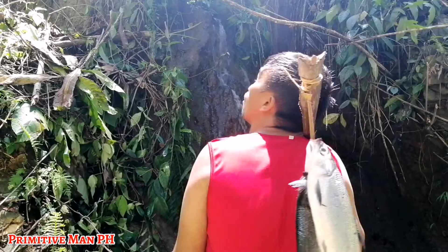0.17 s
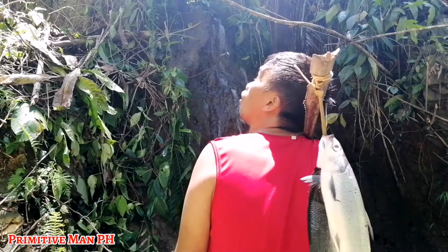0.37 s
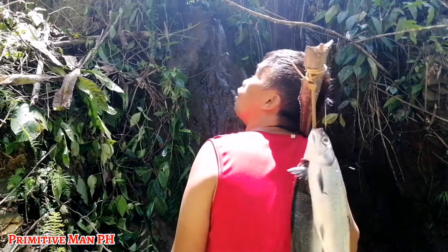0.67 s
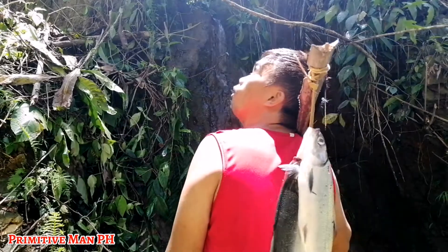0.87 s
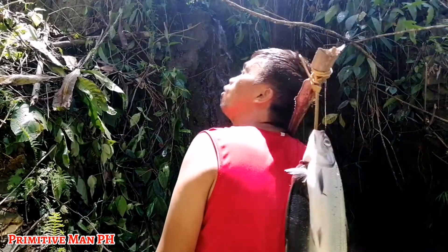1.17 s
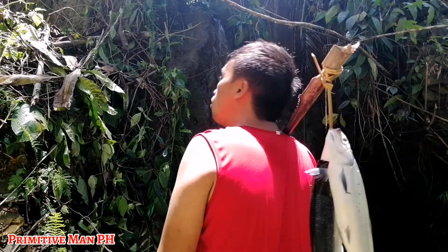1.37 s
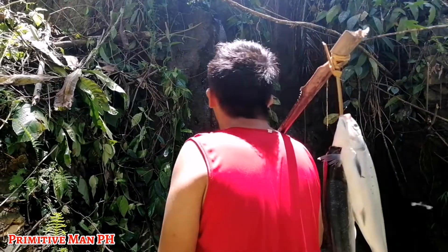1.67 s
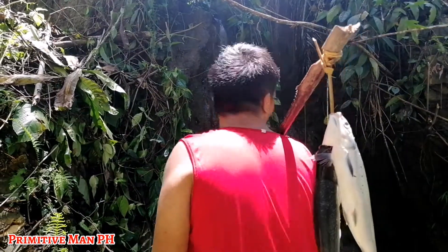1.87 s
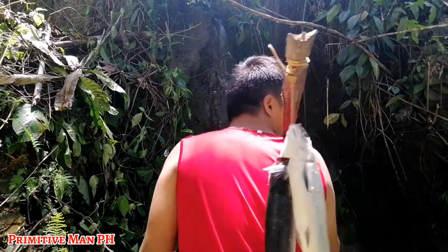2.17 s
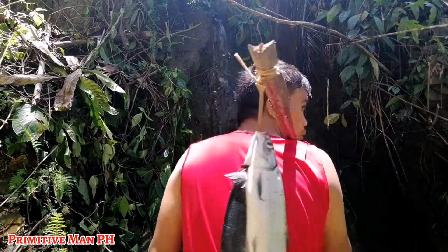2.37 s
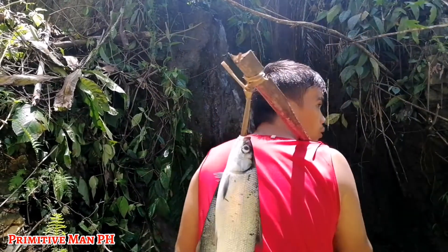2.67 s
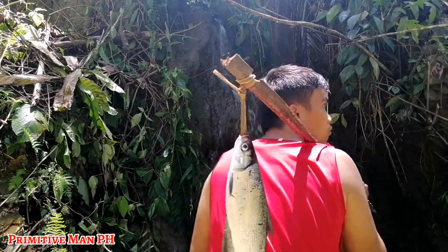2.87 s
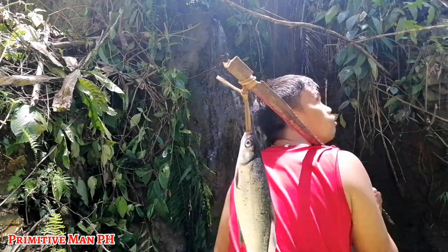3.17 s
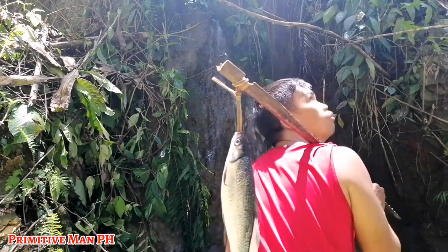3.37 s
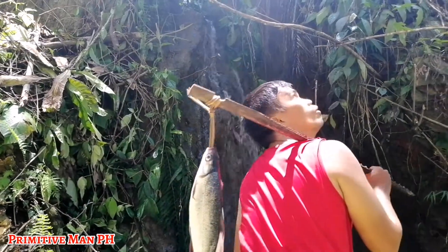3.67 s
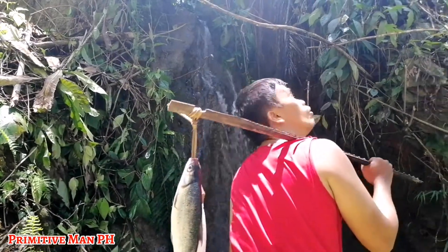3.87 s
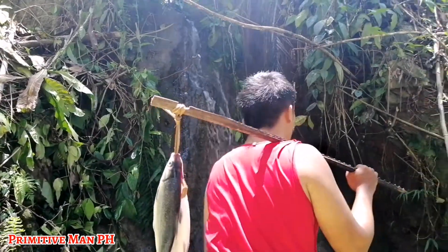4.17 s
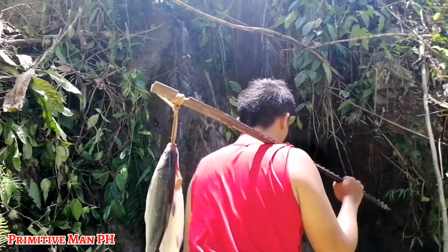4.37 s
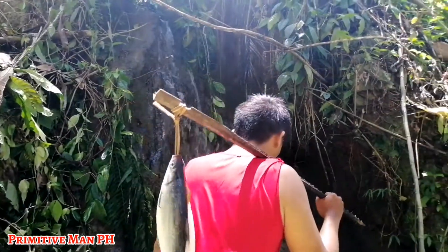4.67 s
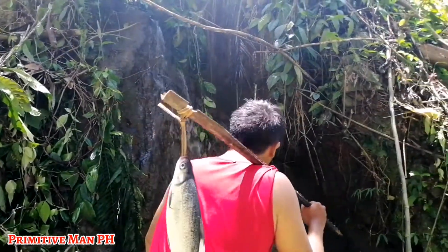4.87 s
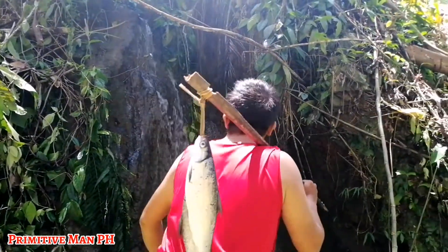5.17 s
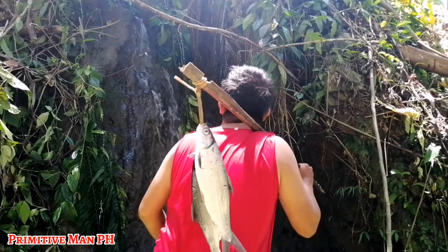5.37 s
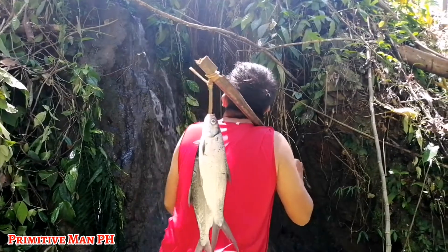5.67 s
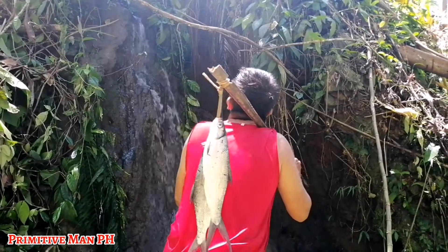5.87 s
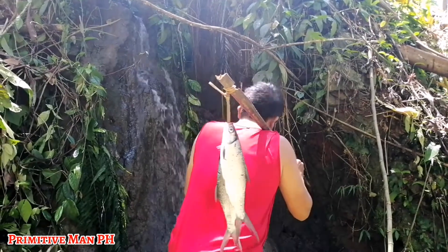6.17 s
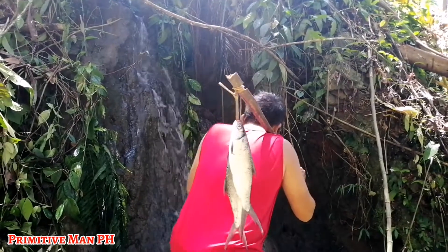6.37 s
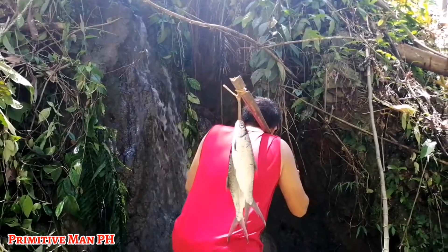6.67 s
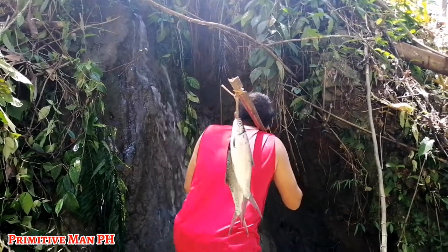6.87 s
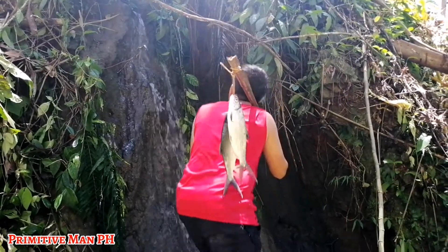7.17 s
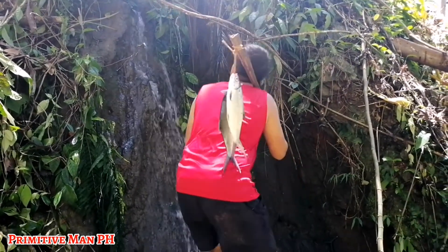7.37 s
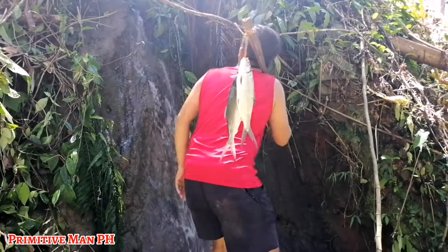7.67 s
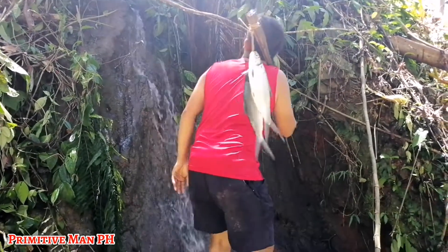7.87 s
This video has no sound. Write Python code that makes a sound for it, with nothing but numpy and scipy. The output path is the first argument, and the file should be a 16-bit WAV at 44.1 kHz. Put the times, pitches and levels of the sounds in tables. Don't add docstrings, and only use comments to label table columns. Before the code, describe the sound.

The first 0.2 seconds are silent, then a small waterfall fades in within about 0.2 seconds and runs to the end at 8 seconds. It is a bright, dense, grainy hiss made of countless drops clicking on wet rock, wide in stereo and leaning right. Heavy drops crack sharply nearby at irregular moments, around 0.8, 1.5, 2.5 and 4.1 seconds, more often and harder after 5.6. Beneath, the pool gives muted hollow plunges, low gulps and short rising bubble rings, mostly faint under the spray. The flow swells slightly near 2.3 to 2.5 seconds, where a dull bump on the microphone housing thuds at left. Around 6 seconds the stereo image shifts subtly as the hand turns. From 6 to 8 seconds, quick surges make the splashing stronger and more restless. A very faint bump comes near 7.6; the level drops at the last instant.

```python
import sys
import numpy as np
from scipy import signal
from scipy.fft import rfft, irfft, next_fast_len
from scipy.io import wavfile

SR = 44100
rng = np.random.default_rng(int(sys.argv[2]) if len(sys.argv) > 2 else 0)


def dump_mix(stems):
    frames = np.atleast_2d(stems).T
    limited = np.clip(frames, -1, 1)
    pcm = np.round(limited * 32767).astype(np.int16)
    wavfile.write(sys.argv[1], SR, pcm)


def boost_factor(decibels):
    exponent = np.asarray(decibels, float) / 20
    return 10 ** exponent


N = 354034


def in_time(rows):
    s, *columns = np.transpose(rows)
    return [np.interp(np.arange(N) / SR, s, c) for c in columns]


def rms_one(x):
    return x / np.sqrt(np.mean(x ** 2) + 1e-20)


def drift(rate_hz):
    r = np.exp(-40 * np.pi * rate_hz / SR)
    noise = rng.standard_normal(N // 20 + 4002)
    slow = signal.lfilter([1], [1, -2 * r, r * r], noise)[4000:]
    return np.interp(np.arange(N) / 20, np.arange(len(slow)), rms_one(slow))


def peaks(x, modes):
    for hz, width_hz, db in modes:
        middle = -2 * np.cos(2 * np.pi * hz / SR)
        lift = boost_factor(db / 2)
        k = np.pi * width_hz / SR
        x = signal.lfilter([1 + k * lift, middle, 1 - k * lift], [1 + k / lift, middle, 1 - k / lift], x)
    return x


def add(out, s, sound, pan_db):
    at = round(s * SR)
    sound = sound[..., :N - at]
    out[:, at:at + sound.shape[-1]] += sound * boost_factor(np.array([[pan_db / 2], [-pan_db / 2]]))


# t/s, left lag behind right/ms, left over right/dB
FALL_BEARING = [
    (0, 0.17, -4),
    (1.8, .18, -5.5),
    (3.3, 0.14, -5),
    (5.7, 0.11, -4.5),
    (6.3, -.15, -4),
    (8.03, -0.13, -4.5),
]


def drops(per_s, uneven_db, width_ms):
    at = np.flatnonzero(rng.random(N) < per_s / SR)
    size_db = uneven_db * np.minimum(rng.standard_exponential(N), 6)
    clicks = boost_factor(size_db)[at] * rng.choice([-1, 1], N)[at]
    lag_ms = in_time(FALL_BEARING)[0][at] + width_ms * rng.standard_normal(N)[at]
    late = np.clip(at + np.round(lag_ms * SR / 1000).astype(int), 0, N - 1)
    return rms_one(np.array([np.bincount(late, clicks, N), np.bincount(at, clicks, N)]))


def wash():
    reflected = signal.butter(1, 500, "high", fs=SR, output="sos")
    stirring = signal.butter(2, 90, fs=SR, output="sos")
    hiss = signal.sosfilt(reflected, rng.standard_normal((2, N)))
    return hiss + boost_factor(10.0) * signal.sosfilt(stirring, rng.standard_normal((2, N)))


# f/Hz, density/(dB per Hz)
ROCK_COLOUR = [(20, -17.5), (60, -18), (130, -12.5), (190, -8.5), (270, -7), (500, -2.5), (1000, 3),
               (1350, 1), (2500, 1), (5500, -1), (9000, 1.5), (13000, -1), (16000, -5.5)]
# f/Hz, width/Hz, lift/dB
POOL_HOLLOWS = [
    (215, 50, 4.5),
    (329.5, 55, 8),
    (553, 140, 4),
    (980, 67, 1),
]


def fall(spray_db, churn_db):
    size = next_fast_len(N)
    hz = np.maximum(np.fft.rfftfreq(size, 1 / SR), 10)
    colour_hz, colour_db = np.transpose(ROCK_COLOUR)
    colour = boost_factor(np.interp(np.log(hz), np.log(colour_hz), colour_db))
    impacts = drops(20000., uneven_db=1.5, width_ms=0.15)
    water = colour * rfft(impacts + boost_factor(-6) * wash(), size)
    octave = np.clip(np.log2(hz / 80), 0, 7.5)
    gush = drift(22.0) + 0.94 * drift(86)
    near = drift(16)
    out = 0
    for centre in np.arange(0, 7.6, .5):
        band = irfft(water * np.clip(1 - 2 * abs(octave - centre), 0, 1), size)[:, :N]
        high = np.clip((centre - 3.9) / 3.38, 0, 1)
        near = rms_one(0.52 * near + 0.94 * drift(13.2))
        patches_db = (0.45 + 0.35 * high) * gush + (1.6 - 2.0 * high) * near
        level_db = high * spray_db + (1 - high) * churn_db
        out = out + band * boost_factor(level_db + np.minimum(patches_db, 3.0))
    return peaks(out, POOL_HOLLOWS)


# t/s, spray level/dB
FALL_NEARNESS = [
    (0.4, -22),
    (2.0, -22),
    (3.4, -21.5),
    (5.8, -21),
    (6.8, -20.5),
    (8.03, -21),
]
# t of crest/s, height/dB, build-up/s
LIP_SURGES = [(0.48, 0, .05), (2.29, 2, 0.13), (2.49, 1.5, 0.13), (6.06, 1.5, .12), (6.21, 0.5, .04),
              (6.63, 1.5, 0.37), (6.86, 2, .18), (6.96, 3, .04), (7.05, 2.5, .03), (7.28, 4, .06),
              (7.58, 2.5, 0.14), (7.72, 2, .06), (7.94, 3, 0.26)]


def flow():
    die_s, plunge_lag_s = 0.057, 0.043
    churn_base_db, masked, answers = -34.5, 0.3, 0.33
    t = np.arange(N) / SR
    surge_db = np.zeros(N)
    for s, db, build_s in LIP_SURGES:
        surge_db = np.maximum(surge_db, np.interp(t, [s - build_s, s, s + die_s], [0, db, 0]))
    landed_db = np.interp(t - plunge_lag_s, t, surge_db)
    spray_db = in_time(FALL_NEARNESS)[0] + surge_db
    return spray_db, churn_base_db - masked * surge_db + answers * landed_db


# t/s, peak level/dB
HEAVY_DROPS = [(0.8135, -9), (1.0001, -10), (1.1078, -11), (1.5114, -9), (1.8087, -9), (2.0647, -9),
               (2.2298, -10), (2.4702, -8), (3.0015, -11), (3.8007, -13), (4.113, -9), (4.2272, -9),
               (5.6331, -7), (5.7009, -9), (5.9947, -7), (6.2018, -8), (6.3429, -11), (6.4896, -7),
               (6.5834, -7), (6.9466, -8), (7.2713, -10), (7.5322, -8), (7.5916, -7), (7.877, -9),
               (7.9967, -6)]


def smacks():
    out = np.zeros((2, N))
    t = np.arange(round(0.037 * SR)) / SR
    decay = np.exp(-t / 0.0013) + 0.28 * np.exp(-t / 0.011)
    for s, db in HEAVY_DROPS:
        crack = np.diff(rng.standard_normal((2, len(t) + 1))) * decay
        crack = crack / abs(crack).max(axis=1, keepdims=True)
        add(out, s, boost_factor(db - 1.5) * crack, 0)
    return out


def ring(hz, cycles, rise):
    turns = np.arange(round(cycles * SR / hz)) * hz / SR
    shape = np.sin(np.pi * (turns / cycles) ** .75) ** 2
    return shape * np.sin(2 * np.pi * turns * (1 + rise * turns / cycles))


POOL_PAN_DB = -4
# t of peak/s, f/Hz, peak level/dB
AIR_GULPS = [(0.804, 430, -37), (3.152, 376, -35), (4.455, 433, -38), (4.669, 322, -33),
             (5.185, 355, -38.5), (5.238, 330, -31), (5.765, 430, -37), (5.863, 398, -35),
             (6.108, 419, -40), (6.546, 400, -37), (6.626, 324, -33), (7.107, 409, -36), (7.51, 333, -33),
             (7.629, 318, -32)]


def gulps(out):
    for s, hz, db in AIR_GULPS:
        add(out, s - 5.97 / hz, boost_factor(db - 1.0) * ring(hz * 0.976, 12.0, rise=0.034), POOL_PAN_DB)


# t/s, peak level/dB, f/Hz
DEEP_PLUNGES = [(0.744, -45, 183), (1.063, -32.5, 221), (1.383, -39, 234), (1.661, -35, 215),
                (2.108, -40, 215), (2.424, -37, 223), (2.646, -35, 220), (2.856, -35, 221),
                (3.156, -38, 207), (3.241, -39, 234), (3.533, -35, 202), (3.822, -35, 213),
                (4.318, -39, 215), (4.669, -35.5, 218), (4.756, -32, 215), (5.007, -36, 202),
                (5.194, -39, 218), (5.294, -37, 210), (5.861, -38, 242), (5.982, -36, 210),
                (6.392, -38, 215), (6.791, -39.5, 213), (6.985, -39, 228), (7.085, -40, 251),
                (7.153, -37, 224), (7.857, -34, 207)]


def plunges(out):
    for s, db, hz in DEEP_PLUNGES:
        add(out, s, boost_factor(db - 1.0) * ring(hz * 0.977, 6.8, rise=.02), -3)


# t of peak/s, f/Hz, peak level/dB
CLEAR_BUBBLES = [(0.801, 667, -33), (1.033, 800, -32), (1.499, 1180, -28.5), (2.088, 1604, -29),
                 (2.148, 876, -31), (2.342, 1076, -28), (2.823, 690, -34), (2.917, 2379, -30),
                 (2.998, 1870, -29), (3.013, 2500, -28), (3.389, 610, -33.5), (3.406, 1162, -27),
                 (3.254, 1195, -32), (3.528, 2121, -27), (3.808, 996, -32), (3.936, 1210, -30),
                 (3.992, 1539, -33), (4.052, 1561, -28), (4.47, 1600, -31), (4.5, 2422, -29),
                 (4.625, 636, -32), (5.026, 2280, -27), (5.432, 2067, -27), (6.518, 2000, -27),
                 (7.234, 517, -33.8), (7.277, 523, -32), (7.497, 2620, -24), (7.561, 1140, -29),
                 (7.705, 1399, -31), (7.725, 1690, -29)]


def bubbles(out):
    spots = np.clip(rng.standard_normal(len(CLEAR_BUBBLES)), -2, 2)
    for (s, hz, db), spot in zip(CLEAR_BUBBLES, spots):
        cycles = 4.78 + .016 * hz
        sound = boost_factor(db + 1.5) * ring(hz * .98, cycles, rise=0.017)
        add(out, s - .42 * cycles / hz, sound, POOL_PAN_DB + 2.5 * spot)


def bubble_crowd(out):
    for when, size, loud, side in rng.random((900, 4)):
        hz = 299.7 * 12.7 ** size
        sound = boost_factor(-48 + 3.2 * loud) * ring(hz, 14.0, rise=0.044)
        add(out, when * (N - 1) / SR, sound, -3 + 8 * (side - .5))


def pool(lag_ms):
    out = np.zeros((2, N))
    gulps(out)
    plunges(out)
    bubbles(out)
    bubble_crowd(out)
    behind = np.arange(N) - lag_ms * SR / 1000
    out[0] = np.interp(behind, np.arange(N), out[0])
    return out


# f/Hz, width/Hz, lift/dB
LEFT_RESONANCES = [
    (11150, 2300, 12.5),
    (1583, 130, 5.5),
]
RIGHT_RESONANCES = [
    (9775, 3270, 13),
    (3430, 1320, 6),
    (5600, 4800, -2),
    (7100, 590, 1),
]


def through_ports(water, pan_db):
    left = peaks(water[0], LEFT_RESONANCES) * boost_factor(pan_db / 2 + 1.58)
    right = peaks(water[1], RIGHT_RESONANCES) * boost_factor(-pan_db / 2 + 0.05)
    return np.array([left, right])


# t/s, peak level/dB, length/s, left over right/dB
HAND_BUMPS = [
    (2.318, -22, .024, 10.5),
    (7.562, -39, 0.011, 3),
]


def bumps():
    out = np.zeros((2, N))
    for s, db, length_s, pan_db in HAND_BUMPS:
        u = np.linspace(0, 1, round(length_s * SR))
        push = np.sin(np.pi * u ** 0.52) ** 2
        add(out, s, boost_factor(db - pan_db / 2 + 3.0) * push, pan_db)
    bass_cut = signal.butter(1, 3.5, "high", fs=SR, output="sos")
    return signal.sosfilt(bass_cut, out + 1e-18)


def scene():
    spray_db, churn_db = flow()
    lag_ms, pan_db = in_time(FALL_BEARING)
    water = boost_factor(-3.0) * fall(spray_db, churn_db + 12.0) + smacks()
    return through_ports(water, pan_db) + pool(lag_ms) + bumps()


def top_cut(x):
    return signal.sosfilt(signal.butter(12, 15520, fs=SR, output="sos"), x)


def record(dry):
    fade_start_s, fade_s, dip_s, dip_db = 0.219, 0.18, 8.001, -5
    gain = np.clip((np.arange(N) / SR - fade_start_s) / fade_s, 0, 1) ** 1.55
    gain[round(dip_s * SR):] *= boost_factor(dip_db)
    rounded = 1.2 * np.tanh(dry / 1.2)
    return top_cut(rounded * gain)


dry = scene()
out = record(dry)
dump_mix(out)
```